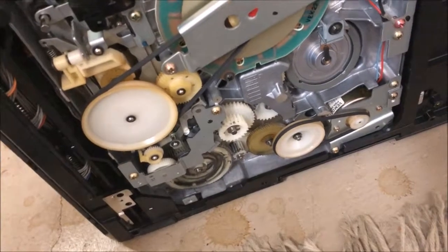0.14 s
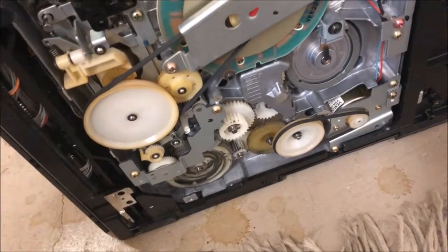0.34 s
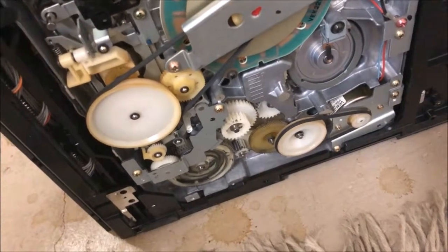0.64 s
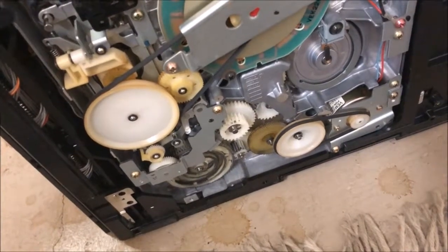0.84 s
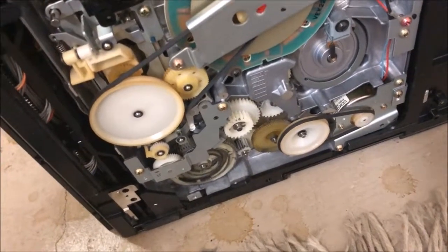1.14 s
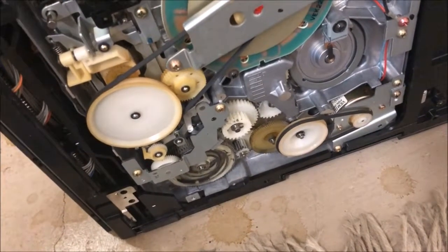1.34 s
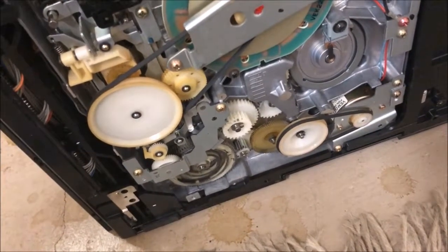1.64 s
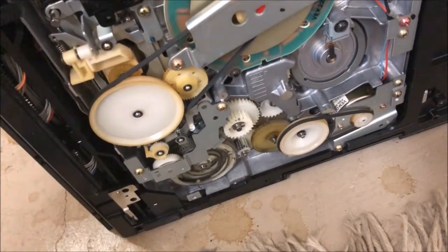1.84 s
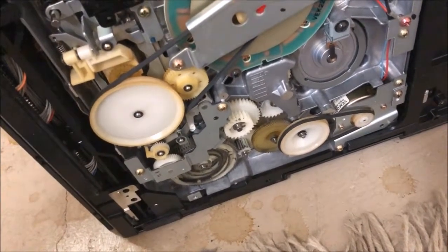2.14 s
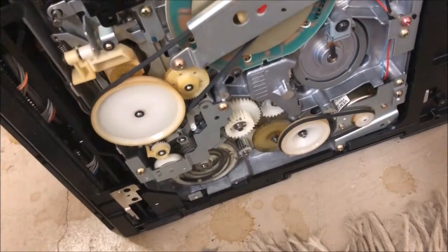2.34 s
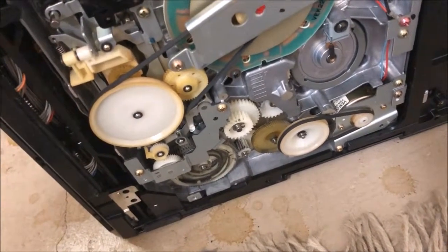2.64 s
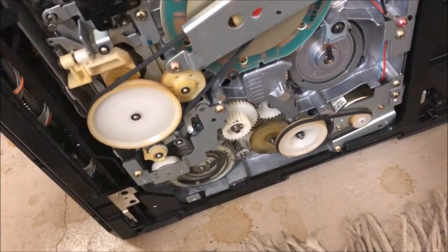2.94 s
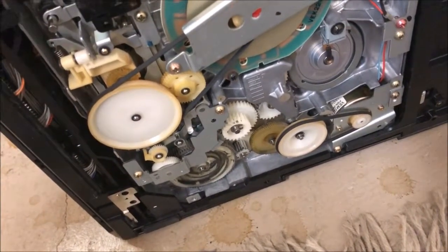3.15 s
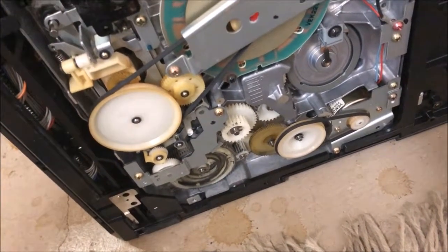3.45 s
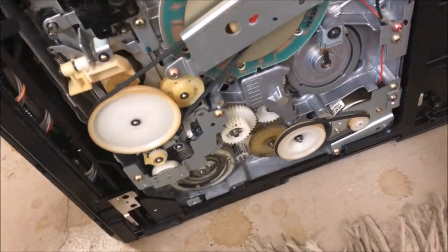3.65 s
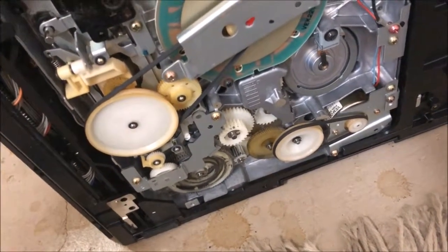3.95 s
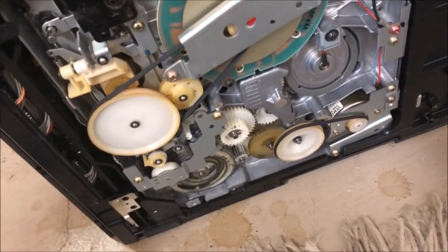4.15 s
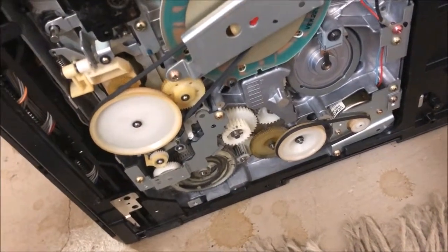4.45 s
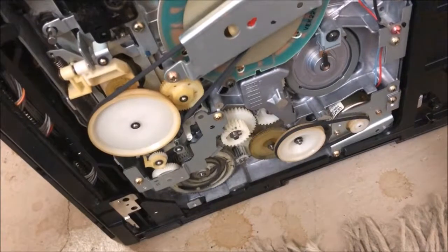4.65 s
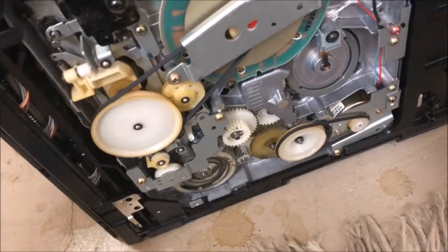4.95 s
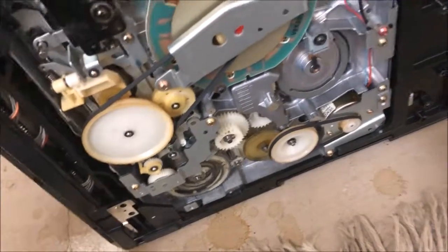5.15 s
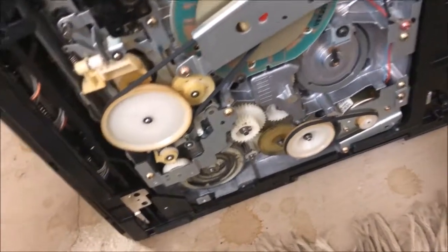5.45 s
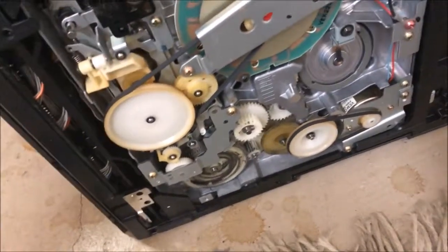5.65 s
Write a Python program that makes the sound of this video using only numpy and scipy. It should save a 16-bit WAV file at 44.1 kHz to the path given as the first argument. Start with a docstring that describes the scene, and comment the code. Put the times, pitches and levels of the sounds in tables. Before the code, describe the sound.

The open tape deck of a video recorder runs throughout, close to the microphone in a small room. A quiet, slightly uneven whir combines low motor hum, a rasp, fluttering gear whine around two kilohertz, soft hiss and a faint, wavering whistle at the top of hearing. Faint plastic ticks, brief scrapes and dull knocks appear irregularly. At 1.05 seconds a lever clicks sharply, with a smaller tick and knock at 1.24. Soft ticks continue near 1.6, 1.9, 2.4 and 2.85, growing firmer from 3.25 to 3.65, where a sprung arm lands with a thud and thin twang. More clicks cluster around 4.3 to 4.4. At 4.83 a latch releases with a very loud, hard double clack, rattling loose parts and jolting the case. Tiny rising squeaks follow at 4.91 to 4.98, then a crisp, lighter snap at 5.4 and a flurry of small ticks and knocks until about 5.6, over the continuing whir.

```python
"""In a small room, the open tape deck of a video recorder runs, heard from close by.
Motors and gears sound as sums of sines and as noise filtered by the chassis; a picture tube whistles faintly.
Plastic gears and levers tick, knock, scrape and creak: short bursts of coloured noise, modes and squeaks.
Near the end a latch lets go with a loud clack, and a lighter pawl snaps after it: struck, damped modes.
The struck and rubbed parts also excite a short, diffuse room tail."""
import sys
import numpy as np
from scipy import signal
from scipy.fft import rfft, irfft, next_fast_len
from scipy.io import wavfile

SR = 44100
rng = np.random.default_rng(int(sys.argv[2]) if len(sys.argv) > 2 else 0)


def wav_out(sig):
    """Save sig, one row per channel (or a flat mono array), as 16-bit PCM at SR to the path in sys.argv[1]."""
    wavfile.write(sys.argv[1], SR, np.round(np.clip(np.atleast_2d(sig).T, -1, 1) * 32767).astype(np.int16))


N = 255868
TIME = np.arange(N) / SR  # [s]
AGE = TIME[:SR // 2]  # time since a blow [s]

# room rumble and microphone hiss: (frequency [Hz], relative density [dB per Hz])
FLOOR_COLOUR = [(20, -26.5), (35, -16.5), (55, 2.5), (125, -0.5), (170, -2.5), (220, -2), (330, -7),
                (500, -10.5), (1000, -14), (3000, -17.5), (6300, -24), (9300, -22.5), (11000, -25),
                (14200, -25), (16000, -18)]
# decay time of the room: (frequency [Hz], t60 [s])
ROOM_T60 = [(100, 0.84), (500, 0.24), (1500, 0.31), (4000, 0.28), (8000, 0.23), (16000, 0.11)]
# colour of the room tail at its start: (frequency [Hz], relative level [dB])
ROOM_COLOUR = [(60, -13), (130, 4), (280, 6), (500, 3), (750, -1), (1300, -1.5), (4000, -1.5), (8000, -1),
               (16000, 0)]
# course of the picture tube's line whistle: (time [s], level before gain and waver [dB rms])
WHISTLE_COURSE = [(0, -74.1), (0.5, -69), (1.2, -74), (1.65, -69.7), (2.0, -74.6), (3.5, -65.5),
                  (4.75, -67.2), (5.2, -72.9), (5.75, -83)]
# strong orders of the head drum motor: (multiple of HUM_HZ [1], level before unsteadiness [dB rms])
DRUM_ORDERS = [(1, -82), (2, -73), (6, -76), (12, -82), (15, -84), (18, -76.5), (21, -76.5), (23, -82.5),
               (27, -79), (33, -80), (34, -79.5), (35, -80), (36, -66.5), (37, -73.5), (38, -87), (39, -80),
               (54, -78.5), (69, -82), (104, -86)]
# tooth tones of the gear train: (nominal frequency [Hz], level [dB rms])
GEAR_TONES = [(2122, -76), (2140, -90.5), (2181, -80), (2193, -76), (2206, -79), (2229, -80)]
# resonances of the steel chassis: (frequency [Hz], width [Hz], relative level [dB])
CHASSIS_RESONANCES = [(730, 94, -8.5), (1330, 210, -9.5), (1690, 99, -15), (2150, 125, 1), (2440, 130, -11),
                      (2855, 170, -13.5), (3212, 84, -7), (3464, 51, -7.5), (3630, 124, -10),
                      (4100, 130, -10), (4230, 47, -18), (4800, 120, -14.5), (5050, 90, -18.5),
                      (5730, 100, -16), (6380, 460, -20.5), (6970, 95, -18.5), (8700, 550, -18.5),
                      (10540, 450, -16.5), (11600, 430, -16), (12350, 300, -17), (14100, 500, -15.5)]
# ticks of gear teeth and levers: (time [s], click level [dB], bright edge level [dB], click colour factor [1])
TICKS = [(.1242, -52, -63, .8), (.792, -53, -51, 1), (1.2428, -42.5, -44, .6), (1.636, -51, -64, .75),
         (1.881, -46, -51, .7), (2.3689, -45, -57, .7), (2.8505, -45, -60, .85), (3.246, -41, -47, 1.05),
         (3.567, -38.5, -40, 1.25), (4.2712, -47, -52, .9), (4.2995, -44, -56, .85),
         (4.323, -43.5, -43, .9), (5.052, -46, -40, 1.2), (5.251, -45, -47, 1), (5.4306, -50, -49, 1.2),
         (5.4557, -51, -50, 1), (5.4885, -47, -42, 1.1), (5.5299, -39.5, -46, 1.05), (5.590, -50, -59, 1.1)]
# colour of a tick's click: (frequency before the factor [Hz], relative density [dB per Hz])
CLICK_COLOUR = [(200, -14), (700, -4), (2200, -2), (3500, 4), (4600, 1), (6500, -6), (11000, -28)]
# colour of a tick's bright edge: (frequency [Hz], relative density [dB per Hz])
EDGE_COLOUR = [(4000, -20), (6500, 5.5), (10000, -8.5), (16000, -5)]
# scrapes of sliding parts: (time [s], length [s], level before the swell [dB], colour factor [1])
SCRAPES = [(.122, .026, -57, .28), (.795, .035, -58, .35), (1.612, .036, -58, .65), (1.968, .028, -60, .85),
           (2.35, .035, -58, .45), (2.565, .03, -63, .9), (2.613, .016, -59, .75), (3.25, .028, -53, .7),
           (3.621, .03, -58, .4), (4.39, .055, -58, .7), (5.412, .045, -59, .5), (5.568, .028, -56, .36)]
# dull knocks of the housing: (time [s], level [dB], pitch factor [1])
KNOCKS = [(1.2392, -44.5, 1.1), (1.255, -51, .7), (1.621, -56, 1.15), (1.844, -53, 1.1), (1.885, -56, .9),
          (1.992, -58, 1.1), (2.356, -50, 2.1), (2.371, -53, 1), (2.852, -43, .95), (3.247, -45, 1.8),
          (3.257, -49, 1), (3.571, -50, 1.4), (4.274, -52, 1.2), (4.322, -46, 1.9), (5.228, -50, .7),
          (5.538, -49, .65)]
# main modes of the housing: (frequency before the factor [Hz], relative level [dB], t60 [s])
HOUSING_MODES = [(430, -9, .06), (560, -2, .04), (720, 1, .035), (880, -4, .03), (1230, -8, .03)]
# dense, weaker modes of the housing: (frequency before the factor [Hz], relative density [dB per Hz])
KNOCK_COLOUR = [(130, -20), (320, -9), (470, 0), (800, 0), (1250, -2), (1700, -6), (2500, -13), (5700, -22),
                (15000, -45)]
# swings of a sprung arm: (lift time [s], lift knock level [dB], landing knock level [dB],
# landing pitch factor [1], spring level at the landing [dB])
SWINGS = [(3.583, -48, -39, 1, -53.5), (4.351, -48, -42, 1.15, -51), (5.524, -49, -48, 1.6, -56.5)]
# modes of the arm's spring: (frequency [Hz], relative level [dB], t60 [s])
SPRING_MODES = [(403, 2, 0.24), (654, -2, 0.14), (1190, -4.5, .12), (1480, -5, 0.13), (5090, -4, 0.21)]
# slips of the sliding lever: (time [s], level at the height of the slip [dB rms], mean squeak frequency [Hz])
SLIPS = [(4.912, -46, 1140), (4.938, -46, 1190), (4.955, -46, 1340), (4.978, -49, 1560)]
# modes of the lever: (frequency [Hz], relative level [dB], t60 [s])
LEVER_MODES = [(603, -4, 0.017), (818, 0.5, 0.032), (1210, -5, .025), (1314, -7, 0.049), (1570, 0.5, 0.027),
               (1880, -12, 0.02), (2064, -2, 0.026), (2510, -1, 0.024), (2930, 2, 0.018), (3290, -8, 0.026),
               (4400, -5, 0.014)]
# blows on the lever: (time [s], ring level [dB], crack level [dB])
LEVER_BLOWS = [(1.0497, -32.3, -34)]
# colour of the lever's crack: (frequency [Hz], relative density [dB per Hz])
LEVER_CRACK = [(200, -22), (500, -3), (900, -2), (1700, -4), (3200, 1), (4900, -1), (6800, -12), (9300, -9),
               (15000, -19)]
# modes of the pawl: (frequency [Hz], relative level [dB], t60 [s])
PAWL_MODES = [(1690, -15, 0.024), (2250, -7, 0.03), (2900, -2, 0.017), (3400, 0, 0.022), (4300, 1, 0.015),
              (4770, -2, 0.021), (5590, -13, 0.021), (8240, -8, .012)]
# blows on the pawl: (time [s], ring level [dB], crack level [dB])
PAWL_BLOWS = [(5.3992, -26.5, -32), (5.4012, -41, -33)]
# colour of the pawl's crack: (frequency [Hz], relative density [dB per Hz])
PAWL_CRACK = [(300, -20), (1200, -13), (2500, -3), (4600, 1), (6200, -11), (9500, -7), (15000, -16)]
# modes of the case: (frequency [Hz], relative level [dB], t60 [s])
CASE_MODES = [(93.3, 4, .14), (131, 1, 0.36), (174.7, 3.5, 0.16), (210.7, -3.5, 0.36), (398, -0.5, 0.3),
              (503, -5, 0.25), (526, -1, 0.45), (760, -5, 0.27), (1141, -4, .26), (1414, -12, 0.34),
              (1857, -9, .3), (1927, -2, 0.34)]
# colour of the loose parts rattling after the latch: (frequency [Hz], relative density [dB per Hz])
CLATTER_COLOUR = [(60, -24), (300, -15), (600, -7), (900, -3), (1200, 1), (1700, -3), (2300, -5),
                  (3000, -9), (4200, -6), (6500, -9), (10000, -14), (16000, -17)]
# modes of the latch: (frequency [Hz], relative level [dB], t60 [s])
LATCH_MODES = [(466, -15, 0.038), (637, -13.5, 0.038), (790, -12.5, 0.034), (1165, 3, 0.034),
               (1340, 0, 0.03), (1645, 2, 0.036), (1713, 0, 0.026), (2237, 1.5, .024), (2530, -14, .018),
               (3470, -10, 0.018), (3710, -4, 0.018), (4090, 0.5, 0.015), (4725, -3, 0.02),
               (5850, -5.5, 0.021), (8880, -8.5, 0.0077)]
# blows on the latch: (time [s], ring level before seating [dB], crack level before seating [dB])
LATCH_BLOWS = [(4.8323, -19, -16), (4.8345, -36, -20), (4.8369, -13, -10), (4.8395, -30.5, -21),
               (4.8495, -31, -31), (4.8605, -31, -32), (4.8745, -31, -38)]
# colour of the latch's crack: (frequency [Hz], relative density [dB per Hz])
LATCH_CRACK = [(40, -45), (150, -19), (280, -18), (500, -7), (1000, -4), (2400, -3.5), (3100, -2.5),
               (4100, 0), (5000, -3), (6800, -8.5), (8700, -6.5), (10300, -12.5), (13000, -15),
               (16000, -15)]

HUM_HZ = 59.81  # motor hum: two cycles to each turn of the drum
WHISTLE_HZ = 15735
BAND_LIMIT_HZ = 16100
TICK_T60, KNOCK_T60 = 0.028, 0.075  # [s]
SWING_S, LANDING_RISE_S = 0.051, 0.006  # from lift to landing; onset of the landing knock
LIFT_TWANG_DB = -10  # the spring at the lift, against the landing
SLIP_S = 0.005  # time from the height of a slip to 1/e of it


def amp(db):
    """Level law: decibels to an amplitude ratio."""
    return 10 ** (np.asarray(db) / 20)


def unit(x):
    """Normalisation: a signal scaled to rms 1."""
    return x / np.sqrt(np.mean(x ** 2) + 1e-20)


def read(points, hz):
    """Interpolation: a table's value at hz, on a log-frequency axis."""
    f, value = np.transpose(points)
    return np.interp(np.log(hz + 1), np.log(f + 1), value)


def add(mix, s, sound):
    """Superposition: a sound added to the mix from time s on."""
    part = mix[round(s * SR):][:len(sound)]
    part += sound[:len(part)]


def noise(spectrum, size):
    """Random-phase synthesis: noise of rms 1 with the given colour."""
    full = next_fast_len(size)
    hz = np.fft.rfftfreq(full, 1 / SR)
    phase = 2 * np.pi * rng.random(len(hz))
    bins = amp(read(spectrum, hz)) * np.exp(1j * phase)
    return unit(irfft(bins, full)[:size])


def drift(rate):
    """Slow random fluctuation: rms 1, straight lines between 2 * rate random values a second."""
    steps = TIME * 2 * rate
    knots = rng.standard_normal(2000)
    return unit(np.interp(steps, np.arange(len(knots)), knots))


def fade(t60):
    """Exponential decay: a loss of 60 dB in t60 seconds."""
    return np.exp(-np.log(1000) * AGE / np.maximum(t60, 1e-3))


def onset(rise):
    """Exponential approach: a gain that nears 1 with time constant rise, in seconds."""
    return 1 - np.exp(-AGE / rise)


def tone(cycles, db):
    """Phase accumulation: a sine of the given rms level that follows a count of cycles."""
    return np.sqrt(2) * amp(db) * np.sin(2 * np.pi * (cycles + rng.random()))


def ring(modes):
    """Modal superposition: damped sines, neighbours swinging in opposite directions."""
    out = np.zeros(len(AGE))
    for k, (hz, db, t60) in enumerate(modes):
        out += (-1) ** k * amp(db) * fade(t60) * np.sin(2 * np.pi * hz * AGE)
    return out


def burst(spectrum, t60, rise):
    """High modal density: modes too close to tell apart sound as noise that swells and dies away."""
    return noise(spectrum, len(AGE)) * fade(t60) * onset(rise)


def strike(blows, modes, crack, crack_t60):
    """Impact excitation: each blow rings the part's modes and a short crack of dense modes."""
    out = np.zeros(N)
    for s, ring_db, crack_db in blows:
        crack_sound = noise(crack, len(AGE)) * fade(crack_t60)
        add(out, s, amp(ring_db) * ring(modes) + amp(crack_db) * crack_sound)
    return out


def chassis(x, lowest_hz=0):
    """Resonant transmission: a drive passes mostly near resonances, with deep valleys between; rms 1."""
    full = next_fast_len(N)
    hz = np.fft.rfftfreq(full, 1 / SR)
    power = np.zeros(len(hz))
    for f, width, db in CHASSIS_RESONANCES:
        if f >= lowest_hz:
            power += amp(2 * db) / (1 + ((hz - f) / width) ** 2) ** 2
    return unit(irfft(rfft(x, full) * np.sqrt(power), full)[:N])


def room(x, build=0.0044):
    """Diffuse reverberation: noise with a decay time for each frequency, convolved with the dry sound."""
    hz, t, z = signal.stft(rng.standard_normal(len(AGE)), SR, nperseg=256)
    decay = np.exp(-np.log(1000) * t / read(ROOM_T60, hz)[:, None])
    z = z * amp(read(ROOM_COLOUR, hz))[:, None] * decay
    tail = signal.istft(z, SR, nperseg=256)[1][:len(AGE)]
    tail = tail * (1 - np.exp(-(AGE / build) ** 2))  # echoes build up over a few milliseconds
    return signal.fftconvolve(x, tail / np.linalg.norm(tail))[:N]


def hiss(level_db=-62.0, flicker_db=1.64):
    """Stationary noise with random gain: room rumble and microphone hiss, never quite even."""
    return amp(level_db + flicker_db * drift(25)) * noise(FLOOR_COLOUR, N)


def whistle(gain_db=1.0, waver_db=2.2):
    """Standing waves: the line whistle swells and sinks as the microphone drifts through them."""
    course_db = np.interp(TIME, *np.transpose(WHISTLE_COURSE))
    return tone(WHISTLE_HZ * TIME, gain_db + course_db + waver_db * drift(10))


def drum(wander=0.0003006, rasp_db=-68, unsteady_db=1.5):
    """Periodic excitation: nearly steady orders of a servo-held motor, and a rasp repeating every turn."""
    cycles = HUM_HZ * np.cumsum(1 + wander * drift(3.11)) / SR
    orders = sum(tone(k * cycles, db + unsteady_db * drift(12)) for k, db in DRUM_ORDERS)
    bearing = rng.standard_normal(round(2 * SR / HUM_HZ))  # one turn lasts two cycles of the hum
    rasp = np.interp(cycles / 2 % 1, np.linspace(0, 1, len(bearing)), bearing)
    return orders + amp(rasp_db) * chassis(rasp, lowest_hz=2350)


def gears(wander=0.00126, rub_db=-62.5, flutter_db=2):
    """Beats: close tooth tones of belt-driven gears interfere over the uneven rub of their teeth."""
    clock = np.cumsum(1 + wander * drift(4)) / SR
    teeth = sum(tone(hz * clock, db) for hz, db in GEAR_TONES)
    rub = rng.standard_normal(N) * amp(flutter_db * drift(60))
    return teeth + amp(rub_db) * chassis(rub)


def tick(click_db, edge_db, factor=1):
    """Contact of plastic: a click coloured by the size of the part, and a bright edge if it is hard."""
    click = amp(click_db) * noise(np.multiply(CLICK_COLOUR, [factor, 1]), len(AGE))
    edge = amp(edge_db) * noise(EDGE_COLOUR, len(AGE))
    return (click + edge) * fade(TICK_T60)


def backlash(count=12, click_db=-61, edge_db=-71, spread_db=3.5):
    """Backlash: play between the gears makes faint, soft ticks at random moments."""
    out = np.zeros(N)
    for when, size in rng.random((count, 2)):
        add(out, when * N / SR, amp(spread_db * (2 * size - 1)) * tick(click_db, edge_db))
    return out


def ticks():
    """Discrete impacts: the distinct ticks of gears and levers."""
    out = np.zeros(N)
    for s, click_db, edge_db, factor in TICKS:
        add(out, s, tick(click_db, edge_db, factor))
    return out


def scrapes(grain_db=4):
    """Sliding friction: a short swell of grainy rubbing, in the colour of the part's click."""
    out = np.zeros(N)
    for s, length, db, factor in SCRAPES:
        swell = signal.windows.hann(round(length * SR)) ** .5
        grains = unit(amp(grain_db * drift(150)[:len(swell)]))
        rub = noise(np.multiply(CLICK_COLOUR, [factor, 1]), len(swell))
        add(out, s, amp(db) * swell * grains * rub)
    return out


def knock(pitch=1, rise=0.001, dense_db=-4):
    """Soft impact: a nudge that reaches only the lower modes of the housing."""
    modes = ring(np.multiply(HOUSING_MODES, [pitch, 1, 1])) * onset(rise)
    dense = burst(np.multiply(KNOCK_COLOUR, [pitch, 1]), KNOCK_T60, rise)
    return modes + amp(dense_db) * dense


def knocks():
    """Impacts on the housing: lone knocks, and the lift and landing of each swing of the sprung arm."""
    out = np.zeros(N)
    for s, db, pitch in KNOCKS:
        add(out, s, amp(db) * knock(pitch))
    for s, lift_db, landing_db, pitch, _ in SWINGS:
        add(out, s, amp(lift_db) * knock())
        add(out, s + SWING_S, amp(landing_db) * knock(pitch, LANDING_RISE_S))
    return out


def spring(rise=0.0038):
    """Free vibration: the arm's spring swells into a thin ring, faint at the lift, full at the landing."""
    out = np.zeros(N)
    twang = ring(SPRING_MODES) * onset(rise)
    for s, *_, db in SWINGS:
        add(out, s, amp(db + LIFT_TWANG_DB) * twang)
        add(out, s + SWING_S, amp(db) * twang)
    return out


def creak(jitter=.11):
    """Stick-slip: as the lever settles, plastic slips on steel in rough squeaks, each higher than the last."""
    times, _, hz = np.transpose(SLIPS)
    pitch = np.interp(TIME, times, hz) * (1 + jitter * drift(130))
    level = sum(amp(db) * np.exp(-((TIME - s) / SLIP_S) ** 2) for s, db, _ in SLIPS)
    return level * tone(np.cumsum(pitch) / SR, 0)


def lever():
    """Impact excitation: a single blow rings the lever."""
    return strike(LEVER_BLOWS, LEVER_MODES, LEVER_CRACK, crack_t60=0.026)


def pawl():
    """Impact excitation: the light pawl snaps in two close blows."""
    return strike(PAWL_BLOWS, PAWL_MODES, PAWL_CRACK, crack_t60=0.018)


def jolt(s=4.838, level_db=-39, rise=0.0037):
    """Recoil: the latch sets the whole case swinging in its modes."""
    out = np.zeros(N)
    add(out, s, amp(level_db) * ring(CASE_MODES) * onset(rise))
    return out


def clatter(s=4.840, level_db=-26, t60=.13, lumps_db=4.5):
    """Dense random impacts: loose parts all over the deck, shaken by the latch, rattle and settle."""
    out = np.zeros(N)
    lumps = unit(amp(lumps_db * drift(160)))[:len(AGE)]
    add(out, s, amp(level_db) * lumps * burst(CLATTER_COLOUR, t60, rise=.001))
    return out


def latch(seated_s=4.841, seated_db=-6):
    """Repeated impact and contact damping: quick blows, then a chatter lowered in level once seated."""
    seated = np.clip((TIME - seated_s) / 0.0022, 0, 1)  # the contact closes in 2.2 ms
    blows = strike(LATCH_BLOWS, LATCH_MODES, LATCH_CRACK, crack_t60=0.027)
    return blows * amp(seated_db * seated)


def scene(latch_room_db=-17, clatter_room_db=-2.5, lever_room_db=-14, small_room_db=-16.5):
    """Superposition: the struck and rubbed parts and their echo over the running deck."""
    steady = hiss() + whistle() + drum() + gears()
    small = backlash() + ticks() + scrapes() + knocks() + creak() + pawl()
    lever_blow, rattle, clack = lever(), clatter(), latch()
    to_room = amp(small_room_db) * small + amp(lever_room_db) * lever_blow
    to_room += amp(clatter_room_db) * rattle + amp(latch_room_db) * clack
    struck = small + spring() + lever_blow + jolt() + rattle + clack
    return (steady + struck + room(to_room))[None]


def record(dry):
    """Clipping and low-pass filtering: the full-scale limit, then the band limit."""
    lowpass = signal.firwin(511, BAND_LIMIT_HZ, window=("kaiser", 9), fs=SR)
    return signal.oaconvolve(np.clip(dry, -1, 1), lowpass[None], "same")


dry = scene()
out = record(dry)
wav_out(out)
```